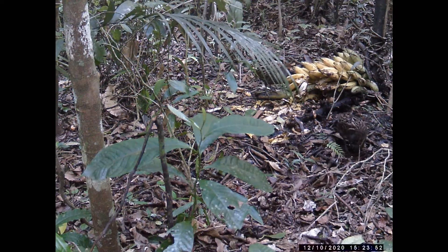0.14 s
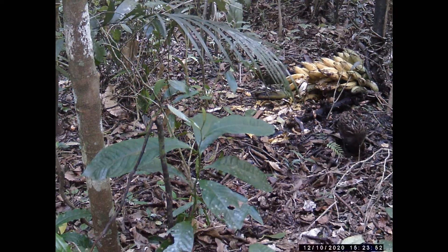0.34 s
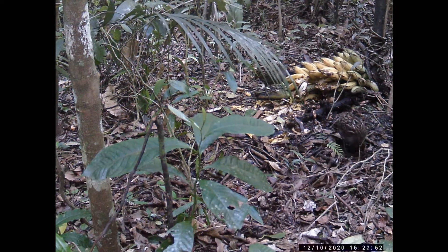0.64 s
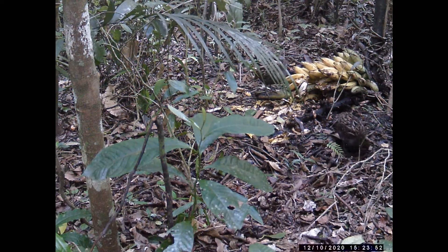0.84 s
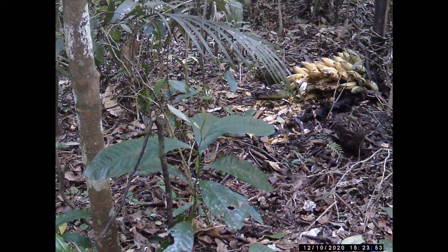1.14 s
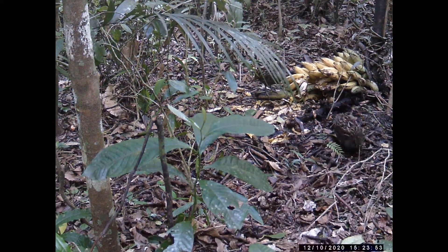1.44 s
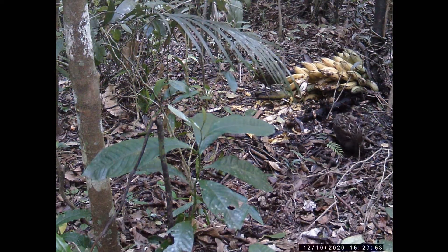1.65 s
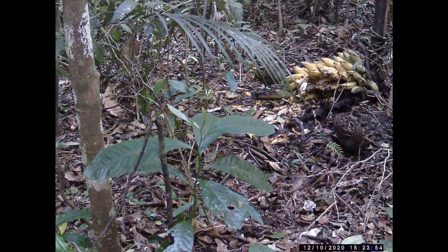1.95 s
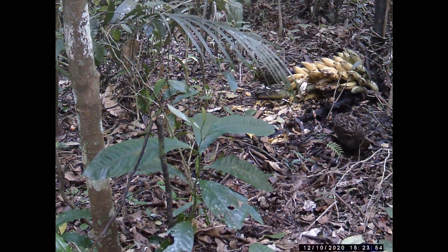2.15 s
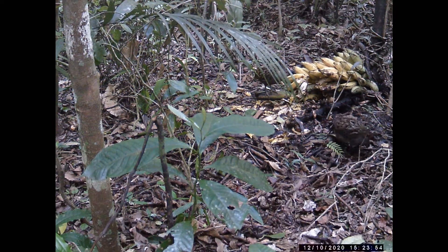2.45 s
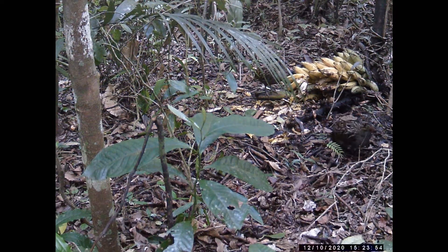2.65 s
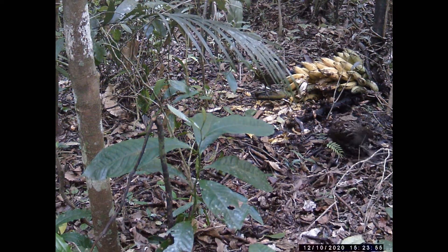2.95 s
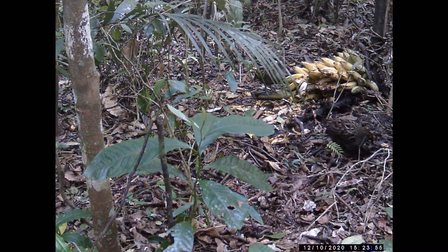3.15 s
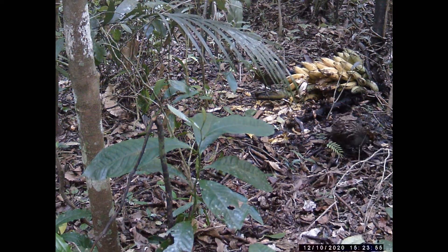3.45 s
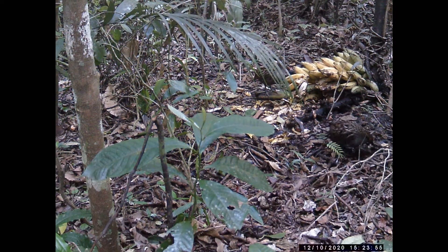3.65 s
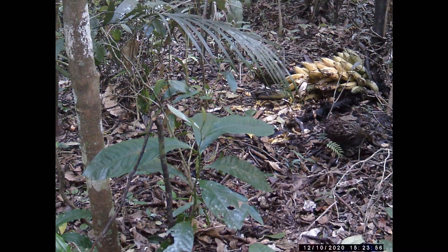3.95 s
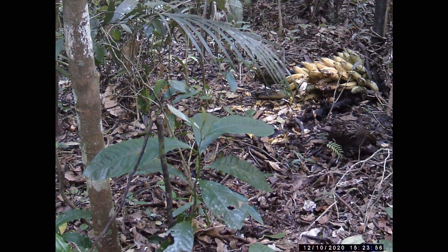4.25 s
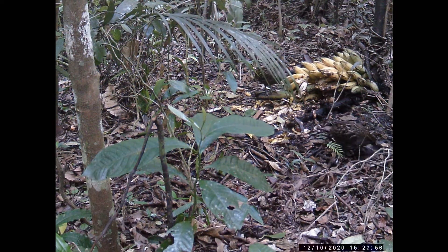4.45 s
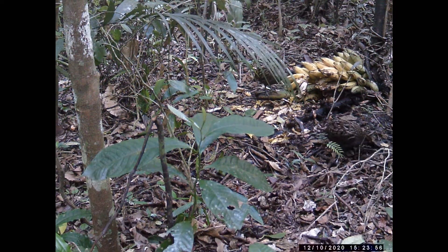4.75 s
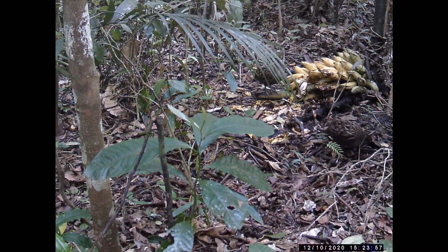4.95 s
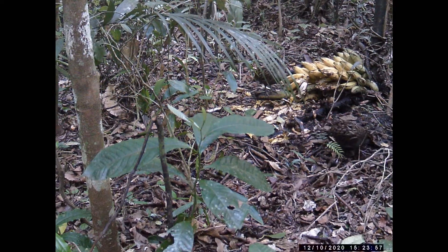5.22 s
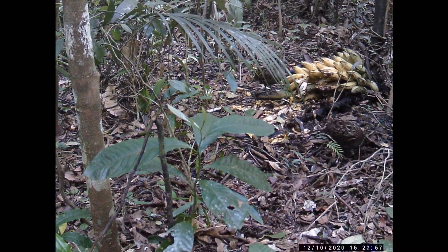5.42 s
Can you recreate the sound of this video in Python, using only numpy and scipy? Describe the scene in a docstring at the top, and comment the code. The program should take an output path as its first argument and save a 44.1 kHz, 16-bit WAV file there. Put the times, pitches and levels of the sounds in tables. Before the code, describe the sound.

In a tropical forest, a thrush whistles slow, fluty, slurred phrases about once a second, ringing lightly among the trunks. Farther off, one bird repeats a quick rising note while others twitter and whistle thinly. From about halfway, a small animal shuffles faintly in dry leaves, with tiny twig snaps. Insects drone high and soft throughout, and a light draught rumbles on the microphone.

```python
"""A tropical forest floor. A thrush whistles slow slurred phrases that ring among the trunks.
Far off, smeared by foliage, one bird runs through rising notes; others twitter and whistle thinly.
Insects drone, and dry leaves crack under a small shuffling animal. A draught rumbles softly on the
microphone, and a noise suppressor turns the pauses down."""
import sys
import numpy as np
from scipy import signal
from scipy.fft import rfft, irfft, next_fast_len
from scipy.io import wavfile
from scipy.ndimage import uniform_filter1d

SR = 44100
rng = np.random.default_rng(int(sys.argv[2]) if len(sys.argv) > 2 else 0)


def master(y):
    """Save y as 16-bit WAV."""
    cut = np.clip(np.atleast_2d(y).T, -1, 1)
    pcm = np.round(cut * 32767)  # scale
    wavfile.write(sys.argv[1], SR, pcm.astype(np.int16))


N = 246057
TIME = np.arange(N) / SR


def from_db(db):
    """Decibels to gain."""
    return 10 ** (np.asarray(db) / 20)


def rms_one(x):
    """Scale to unit rms."""
    return x / np.sqrt(np.mean(x ** 2) + 1e-20)


def envelope(rows):
    """Gain over time from rows of (s, dB)."""
    s, db = np.transpose(rows)
    return from_db(np.interp(TIME, s, db))


def wander(window_samples, count=N):
    """Smoothed noise, unit rms."""
    return rms_one(uniform_filter1d(rng.standard_normal(count), size=int(window_samples)))


def colour(x, spectrum):
    """Minimum-phase filter of unit energy, shaped by rows of (Hz, dB)."""
    hz, db = np.transpose(spectrum)
    size = next_fast_len(N + SR // 2)
    grid_hz = np.maximum(np.fft.rfftfreq(size, 1 / SR), 1)
    gain = from_db(np.interp(np.log(grid_hz), np.log(hz), db))
    cepstrum = irfft(np.log(gain), size)
    cepstrum[1:size // 2] *= 2
    cepstrum[size // 2 + 1:] = 0
    response = np.exp(rfft(cepstrum))
    return irfft(rfft(x, size) * response / np.sqrt(np.mean(abs(response) ** 2)), size)[:N]


def narrow_noise(hz, width_hz):
    """Noise band round one frequency, unit rms."""
    offset = (np.fft.rfftfreq(N, 1 / SR) - hz) / (width_hz / 2)
    return rms_one(irfft(rfft(rng.standard_normal(N)) / (1 + offset ** 2), N))


def trunks(x, direct_db, echo_db, t60_s):
    """Direct sound plus decaying echoes scattered by countless trunks."""
    t = TIME[:SR * 3 // 2]
    echoes = rng.standard_normal(len(t)) * from_db(-60 * t / t60_s) * (1 - np.exp(-t / .0062))
    echoes /= np.sqrt(np.sum(echoes ** 2))
    return from_db(direct_db) * x + from_db(echo_db) * signal.fftconvolve(x, echoes)[:N]


def foliage(x, direct_db, spread_s, echo_db, t60_s):
    """A far path: little arrives directly; leaves smear the call, then trunks echo."""
    t = TIME[:SR * 3 // 2]
    smear = rms_one(np.exp(-t / spread_s))
    tail = from_db(echo_db) * rms_one(from_db(-60 * t / t60_s))
    scatter = rng.standard_normal(len(t)) * np.hypot(smear, tail) / np.sqrt(len(t))
    return from_db(direct_db) * x + signal.fftconvolve(x, scatter)[:N]


def whistle(rows, edge_s, jitter, harmonics=((1, 0),)):
    """A syrinx tone along rows of (s, Hz, dB), with slight random pitch tremor."""
    s, hz, db = np.transpose(rows)
    s = np.sort(s)
    span = slice(*np.searchsorted(TIME, [s[0] - edge_s, s[-1] + edge_s]))
    t, out = TIME[span], np.zeros(N)
    pitch_hz = uniform_filter1d(np.interp(t, s, hz), size=100) * (1 + jitter * wander(200, len(t)))
    phase = 2 * np.pi * np.cumsum(pitch_hz) / SR
    tone = sum(from_db(part_db) * np.sin(k * phase) for k, part_db in harmonics)
    gate = np.sin(np.pi / 2 * np.clip(np.minimum(t - t[0], t[-1] - t) / edge_s, 0, 1)) ** 2
    out[span] = np.sqrt(2) * gate * from_db(np.interp(t, s, db)) * tone
    return out


# Each row: frequency in Hz, relative noise density in dB.
AIR_SPECTRUM = [(25, 1.5), (60, 10.5), (85, 5.5), (115, 0), (190, 1), (330, -4), (600, -7), (1200, -12.5),
                (2500, -11), (4500, -17), (6300, -23.5), (7500, -30.5), (10000, -28.5), (15500, -28.5)]
# Each row: centre in Hz, width in Hz, level in dB re base_db.
DRONE_BANDS = [(92.2, 10, -5), (4580, 600, -12.5), (5980, 110, -10.5), (6100, 300, -11), (7650, 9.4, -25)]
# Each row: time in seconds, level in dB.
CHORUS_ENVELOPE = [(0, -70.5), (.3, -71), (.65, -68.5), (1.0, -83.5), (2.8, -78.5), (5.58, -83.5)]

def background(base_db):
    """Hiss of air and foliage, a low hum, insect drones and a far chorus that dies away."""
    air = from_db(6.5) * colour(rng.standard_normal(N), AIR_SPECTRUM)
    drones = sum(from_db(db) * narrow_noise(hz, width_hz) for hz, width_hz, db in DRONE_BANDS)
    chorus = envelope(CHORUS_ENVELOPE) * narrow_noise(hz=3575, width_hz=280)
    return from_db(base_db) * (air + drones) + chorus


# Each row: frequency in Hz, relative noise density in dB.
EDDY_SPECTRUM = [(4, -9), (12, 0), (20, 0), (30, -11), (45, -13), (65, -18.5), (100, -33.5), (200, -55)]
# Each row: peak time in seconds, rise in dB.
DRAUGHT_PUFFS = [(.07, 10), (.18, 6.5), (.95, 11), (1.4, 11.5), (2.31, 6.5), (3.39, 7), (3.84, 6.5),
                 (4.31, 7)]
# Each row: time in seconds, base level in dB.
DRAUGHT_ENVELOPE = [(0, -51), (1.2, -51.5), (2.5, -55.5), (4.3, -55), (4.6, -61), (5.58, -59)]

def draught(puff_s=.053, waver_db=3, waver_s=.1):
    """Air eddies round the microphone, in puffs at first, then more weakly."""
    drift_db = waver_db * wander(waver_s * SR)
    puffs_db = sum(db * np.exp(-((TIME - s) / puff_s) ** 2) for s, db in DRAUGHT_PUFFS)
    eddies = colour(rng.standard_normal(N), EDDY_SPECTRUM)
    rumble = signal.sosfilt(signal.butter(2, 200, fs=SR, output="sos"), eddies)
    return envelope(DRAUGHT_ENVELOPE) * from_db(drift_db + puffs_db) * rms_one(rumble)


# Each row: time in seconds, level in dB.
SIZZLE_ENVELOPE = [(2.97, -110), (3.02, -65), (3.12, -71), (3.22, -72), (3.3, -87), (3.4, -110)]

def sizzle():
    """A brief thin band of treble noise over the first long rustle."""
    return envelope(SIZZLE_ENVELOPE) * narrow_noise(hz=7840, width_hz=830)


# Each row: time in seconds, relative level in dB.
TWIG_SNAPS = [(.912, -44), (2.0583, -43), (2.899, -47), (3.327, -41), (3.525, -44), (3.603, -37.5),
              (3.768, -42), (3.828, -44.5), (4.494, -41.5), (4.5622, -36), (5.153, -47)]

def snaps(level_db=-8.5, decay_s=.0036, ticks_per_s=1.2, tick_db=-54, brightness=.62):
    """Twigs and leaves snap in bright noise bursts, with fainter ticks at random."""
    strikes = (rng.random(N) < ticks_per_s / SR) * from_db(tick_db + 2 * rng.standard_normal(N))
    for s, db in TWIG_SNAPS:
        strikes[int(s * SR)] += from_db(db)
    decays = signal.lfilter([1], [1, -np.exp(-1 / (decay_s * SR))], strikes + 1e-18)
    bursts = from_db(level_db) * decays * rng.standard_normal(N)
    return signal.lfilter([1, -brightness], [1], bursts)


# Each row: start in seconds, length in seconds, relative level in dB.
ANIMAL_SHUFFLES = [(1.28, .036, -68), (2.96, 0.36, -65), (2.986, 0.058, -61.5), (3.321, 0.11, -66),
                   (3.658, 0.047, -60.5), (3.66, 0.27, -65), (3.734, 0.039, -58), (3.824, 0.036, -61),
                   (4.288, .02, -69), (4.559, .1, -65.5), (4.693, 0.086, -65), (5.078, .14, -73),
                   (5.4, .36, -65.5), (5.428, 0.027, -63)]
# Each row: frequency in Hz, relative gain in dB.
LEAF_SPECTRUM = [(500, -11.5), (1500, -7), (2800, -3), (4000, -1.5), (5500, 2.5), (6500, -0.5),
                 (7300, -6.5), (8500, -9), (10500, -17), (13000, -24), (16000, -32.5)]

def leaves(cracks_per_s=3000, stir_db=-70.5, spread_db=2, clump_db=2.5):
    """Dry litter gives way in clumps of tiny cracks, louder under each shuffle, and sometimes snaps."""
    pressure = from_db(stir_db)
    for s, length_s, db in ANIMAL_SHUFFLES:
        pressure = pressure + from_db(db) * np.sin(np.pi * np.clip((TIME - s) / length_s, 0, 1))
    clumps = from_db(clump_db * wander(250))
    sizes = from_db(spread_db * np.minimum(rng.exponential(1, N), 4)) * rng.choice([-1, 1], N)
    cracks = pressure * rms_one(clumps * sizes * (rng.random(N) < cracks_per_s / SR))
    return trunks(colour(cracks + snaps(), LEAF_SPECTRUM), direct_db=2, echo_db=-8.5, t60_s=.1)


def glides(rows, jitter, taper_db):
    """Whistled glides that swell toward their middle."""
    out = np.zeros(N)
    for s, length_s, first_hz, last_hz, db in rows:
        middle = (s + length_s / 2, np.sqrt(first_hz * last_hz), db)
        curve = [(s, first_hz, db - taper_db), middle, (s + length_s, last_hz, db - taper_db)]
        out += whistle(curve, edge_s=.008, jitter=jitter)
    return out


# Each row: start and length in seconds, first and last pitch in Hz, relative level in dB.
THIN_WHISTLES = [(.04, 0.038, 6250, 6180, -67), (.145, 0.054, 6100, 5900, -61.5),
                 (.39, 0.11, 7250, 6780, -68), (.59, 0.066, 6780, 6610, -59), (.72, 0.21, 6980, 6600, -68),
                 (.82, 0.11, 6500, 6160, -61), (.95, 0.14, 6740, 6130, -69.5),
                 (1.055, 0.091, 6170, 5920, -59)]
DISTANT_CALLS = [(3.47, 0.13, 2550, 3000, -68), (3.66, 0.051, 2650, 2320, -66),
                 (3.91, 0.068, 2850, 3220, -65), (4.69, 0.037, 2850, 3280, -62.5),
                 (4.765, 0.036, 2450, 3230, -60.5), (4.87, 0.042, 3050, 3220, -66.5)]
NEAR_SWEEPS = [(.878, 0.12, 1693, 2668, -63), (2.92, 0.077, 1380, 2320, -65.5),
               (4.085, .045, 1314, 1790, -69), (4.56, 0.092, 1843, 2750, -67)]

def small_birds():
    """Far falling whistles and short calls, mostly echo, and drier upward sweeps from nearer by."""
    thin = glides(THIN_WHISTLES, jitter=.011, taper_db=5)
    calls = glides(DISTANT_CALLS, jitter=.035, taper_db=4)
    sweeps = glides(NEAR_SWEEPS, jitter=.005, taper_db=5)
    return (from_db(-5) * foliage(thin, direct_db=-10, spread_s=.035, echo_db=0, t60_s=.9)
            + from_db(1) * foliage(calls, direct_db=-22, spread_s=.03, echo_db=-2, t60_s=.6)
            + trunks(sweeps, direct_db=0, echo_db=-9, t60_s=.7))


# One list per run. Each row: time in seconds, relative level in dB.
TWITTER_RUNS = [
    [(1.95, -65), (2.2, -63.5), (2.42, -64), (2.6, -67.5), (2.76, -64)],
    [(4.95, -68), (5.1, -61.5), (5.35, -63.5), (5.58, -60)],
]

def twitter(notes_per_s=24, note_s=.0289, low_hz=3180, high_hz=3575):
    """Quick soft upward notes that run together among the trees."""
    out = np.zeros(N)
    for run in TWITTER_RUNS:
        times_s, levels_db = np.transpose(run)
        for s in np.arange(times_s[0], times_s[-1] - .03, 1 / notes_per_s):
            db = np.interp(s, times_s, levels_db) + rng.standard_normal()
            detune = 1 + rng.normal(0, .017)
            curve = [(s, low_hz * detune, db), (s + note_s, high_hz * detune, db)]
            out += whistle(curve, edge_s=.0061, jitter=.0066)
    return from_db(-.5) * foliage(out, direct_db=-15, spread_s=.018, echo_db=-1, t60_s=.63)


# Each row: time into the note in seconds, pitch in Hz, relative level in dB.
SERIES_NOTE = [(0, 2947, -10), (.014, 3088, -1.5), (.032, 3408, 3), (.048, 3640, -3.5), (0.058, 3710, -9.5)]
# Start of each series in seconds.
SERIES_STARTS_S = [.802, 5.324]

def series_bird(level_db, count=10, first_gap_s=.102, steady_gap_s=.123):
    """A far bird repeats a raspy rising note; it turns, so each note takes new paths."""
    k = np.arange(count)
    gaps_s = steady_gap_s + (first_gap_s - steady_gap_s) * np.exp(-k / 1.4)
    levels_db = level_db - 5 * np.exp(-k / .95) - 3 * (k / k[-1]) ** 3  # soft start, fading end
    out = np.zeros(N)
    for start_s in SERIES_STARTS_S:
        for s, db in zip(start_s + np.cumsum(gaps_s) - gaps_s, levels_db):
            if s < TIME[-1]:
                note = whistle(np.array(SERIES_NOTE) + [s, 0, db], edge_s=.005, jitter=.0078)
                out += foliage(note, direct_db=-7, spread_s=.04, echo_db=1, t60_s=.8)
    return out


def lead_note(start_s, end_s, first_hz, held_hz, db, settle_s=.055, swell_s=.038, release_s=.009):
    """Curve of a note that settles from above as it swells, then lets go."""
    t = np.linspace(0, end_s - start_s, 60)
    hz = held_hz + (first_hz - held_hz) * np.exp(-t / settle_s)
    shape_db = -20.5 * np.exp(-t / swell_s) - 8 * np.exp((t - t[-1]) / release_s)
    return np.c_[start_s + t, hz, db + shape_db]


def scoop(start_s, end_s, first_hz, held_hz, drop_hz, db, fade_db):
    """Curve of a note that leaps up, sags and drops away."""
    bend_s, attack_s, sag_hz_per_s = .014, .0051, 305
    t = np.linspace(0, end_s - start_s, 60)
    leap_hz = held_hz + (first_hz - held_hz) * np.exp(-t / bend_s)
    fall_hz = sag_hz_per_s * t + drop_hz * np.exp((t - t[-1]) / bend_s)
    shape_db = -24.5 * np.exp(-t / attack_s) - fade_db * t / t[-1]
    return np.c_[start_s + t, leap_hz - fall_hz, db + shape_db]


def quaver(start_s=.32, end_s=.546, centre_hz=2062, rate_hz=31, depth_hz=42, db=-43.5, fade_db=5):
    """Curve of a fading note with a quick vibrato."""
    t = np.linspace(0, end_s - start_s, 60)
    hz = centre_hz - depth_hz * np.sin(2 * np.pi * rate_hz * t)
    return np.c_[start_s + t, hz, db - fade_db * t / t[-1]]


def warble(start_s=4.178, flips_start_s=4.267, flip_s=.0393, low_hz=1761, high_hz=2090):
    """Curves of a long low note, then quick high-low flips that creep upward."""
    climb_hz_per_s, cup_hz = 266, 114
    along = np.linspace(0, .92, 60)  # each note fills 92% of its slot
    cup = (2 * along - 1) ** 2
    cupped_hz = low_hz + cup_hz * cup
    curves = [np.c_[start_s + .081 * along, cupped_hz, -42 - 7.5 * along]]
    for k in range(6):
        s = flips_start_s + flip_s * (k + along)
        climb_hz = climb_hz_per_s * (s - start_s)
        low = np.c_[s, cupped_hz + climb_hz, np.full_like(s, -45)]
        high = np.c_[s, high_hz + climb_hz, -41 - 11.5 * cup]
        curves.append(low if k % 2 else high)
    return curves


# One curve per slur. Each row: time in seconds, pitch in Hz, relative level in dB.
SLUR_CURVES = [
    [(0.05, 2583, -60), (0.064, 2547, -53.5), (0.122, 2299, -34.5), (0.178, 2234, -43), (0.206, 2307, -57),
     (0.212, 2207, -53.5), (0.278, 2317, -36.5), (0.298, 2336, -37), (0.324, 2140, -44.5)],
    [(0.955, 1610, -58.5), (1.013, 1561, -46), (1.041, 1582, -46), (1.079, 1853, -44.5), (1.095, 1844, -46),
     (1.105, 1654, -42.5), (1.129, 1573, -49), (1.207, 1564, -47), (1.26, 1626, -52)],
    [(2.97, 1640, -59.5), (3.026, 1708, -45.5), (3.082, 1758, -45), (3.114, 1598, -41.5),
     (3.13, 1602, -50.5), (3.208, 1912, -38), (3.228, 1955, -46.5), (3.28, 2363, -38), (3.305, 2458, -57)],
    [(3.36, 2075, -50), (3.372, 2070, -51), (3.414, 1844, -40), (3.432, 1783, -53.5), (3.454, 1897, -39.5),
     (3.528, 1815, -41.5), (3.54, 1803, -54), (3.554, 1835, -53), (3.56, 1873, -61)],
    [(4.968, 2186, -56.5), (4.996, 2140, -42), (5.04, 1830, -40), (5.058, 1684, -52), (5.104, 1860, -36.5),
     (5.198, 1865, -36.5), (5.248, 1806, -47), (5.358, 1768, -45.5), (5.403, 1686, -57)],
]
# Each row: start and end in seconds, first and held pitch in Hz, relative level in dB.
THRUSH_LEADS = [(2.085, 2.235, 2364, 2088, -35), (4.037, 4.184, 2126, 2080, -36)]
# Each row: start and end in seconds, first pitch, held pitch and drop in Hz, relative level and
# fade in dB.
THRUSH_SCOOPS = [(1.262, 1.402, 1668, 2066, 19, -46, 2.5), (1.417, 1.494, 1958, 2009, 30, -45.5, 7),
                 (1.501, 1.556, 1987, 2024, 100, -45, 4), (2.238, 2.363, 1589, 2086, 26, -37.5, 4.5),
                 (2.374, 2.528, 1528, 2054, 153, -39.5, 9.5)]
# Each row: harmonic number, gain in dB.
THRUSH_PARTIALS = [(1, 0.5), (2, -38), (3, -35.5), (4, -53.5)]

def thrush(flutter_db=1.23, flutter_s=.018):
    """Fluted syrinx notes with faint overtones and a fluttering level, ringing among the trunks."""
    leads = [lead_note(*row) for row in THRUSH_LEADS]
    scoops = [scoop(*row) for row in THRUSH_SCOOPS]
    curves = SLUR_CURVES + leads + scoops + [quaver()] + warble()
    song = sum(whistle(curve, edge_s=.005, jitter=.0035, harmonics=THRUSH_PARTIALS) for curve in curves)
    flutter = from_db(flutter_db * wander(flutter_s * SR))
    return trunks(song * flutter, direct_db=-.93, echo_db=-12.5, t60_s=.75)


def scene():
    """Mono mix at one spot near the ground."""
    birds = thrush() + series_bird(level_db=-53) + twitter() + small_birds()
    return (birds + leaves() + sizzle() + background(base_db=-66.5) + draught())[None]


def noise_suppressor(x, threshold_db=-56.5, knee_db=2.5, depth_db=3, window_s=.03):
    """The gain sinks whenever the sound above the rumble falls near the floor."""
    sidechain = signal.sosfilt(signal.butter(2, 800, "high", fs=SR, output="sos"), x)
    power = abs(uniform_filter1d(sidechain ** 2, size=int(window_s * SR)))
    level_db = 10 * np.log10(power + 1e-20)
    quiet = .5 - .5 * np.tanh((level_db - threshold_db) / knee_db)
    return x * from_db(-depth_db * quiet)


def record(dry):
    """Noise suppression, then a steep low-pass at 15.5 kHz."""
    lowpass = signal.ellip(10, .1, 70, 15500, fs=SR, output="sos")
    return signal.sosfilt(lowpass, noise_suppressor(dry))


dry = scene()
out = record(dry)
master(out)
```